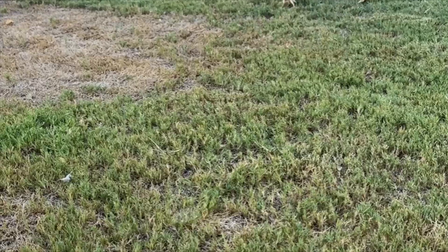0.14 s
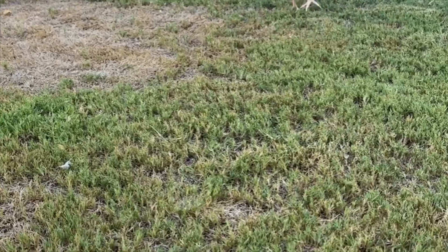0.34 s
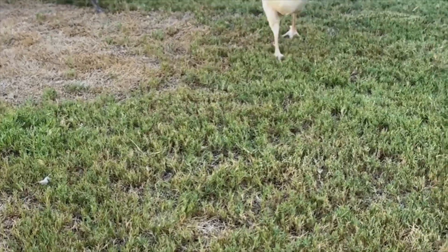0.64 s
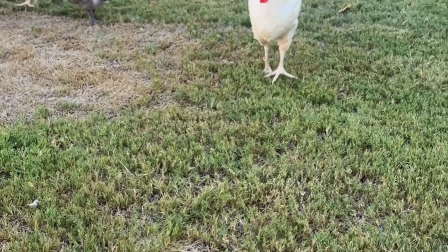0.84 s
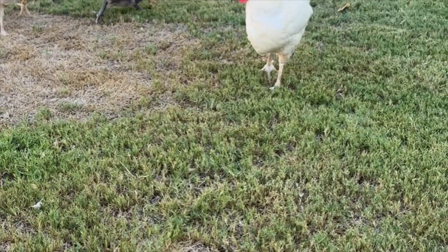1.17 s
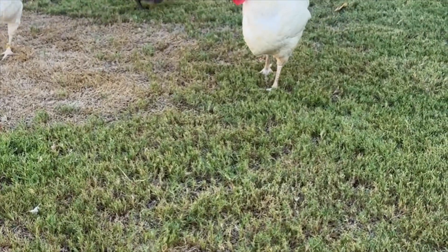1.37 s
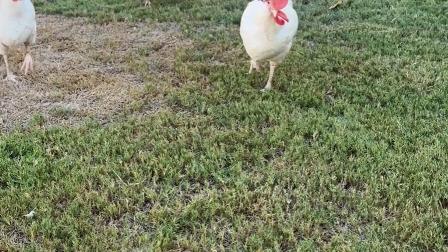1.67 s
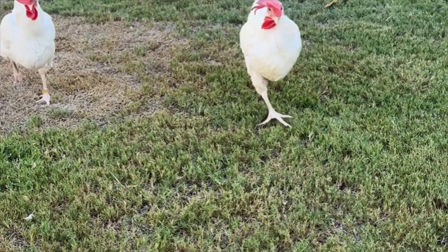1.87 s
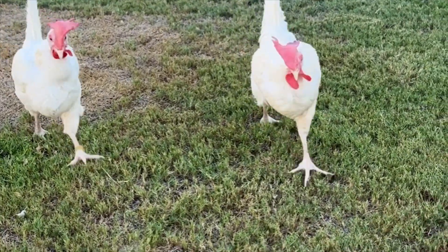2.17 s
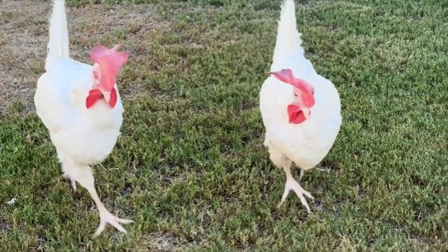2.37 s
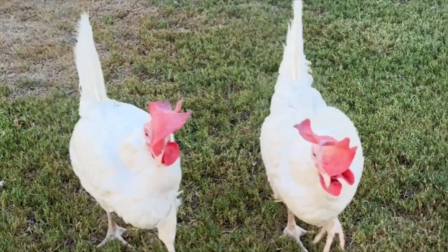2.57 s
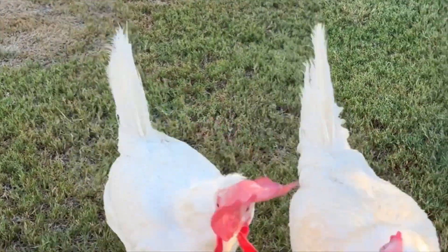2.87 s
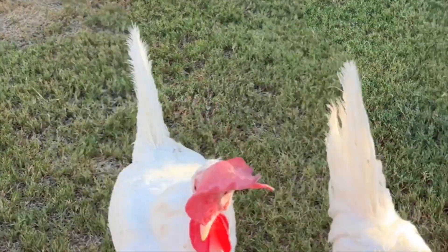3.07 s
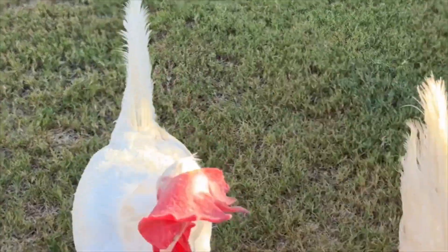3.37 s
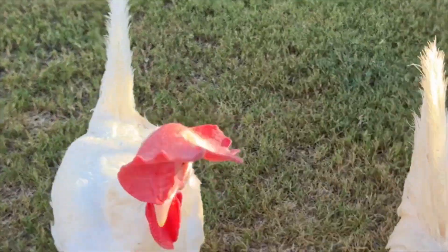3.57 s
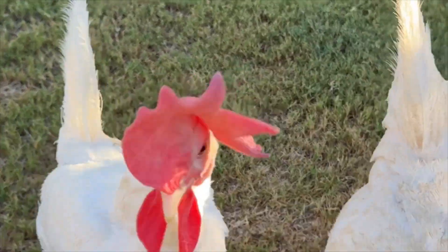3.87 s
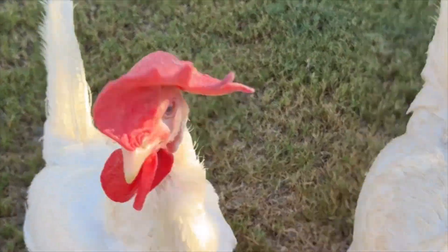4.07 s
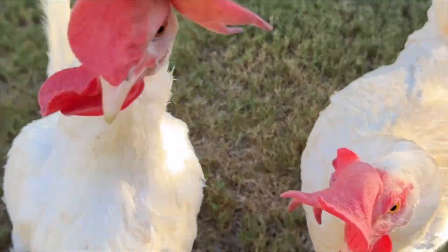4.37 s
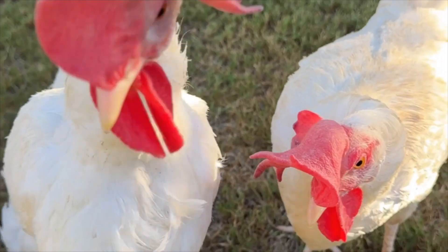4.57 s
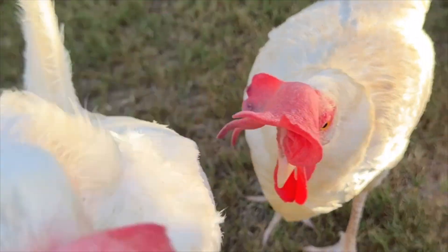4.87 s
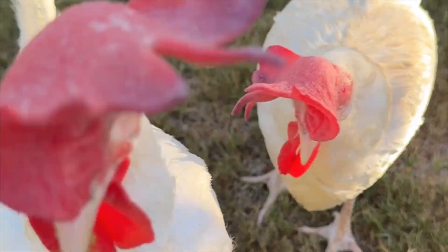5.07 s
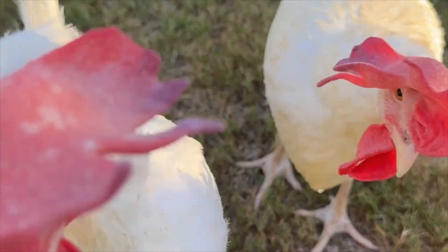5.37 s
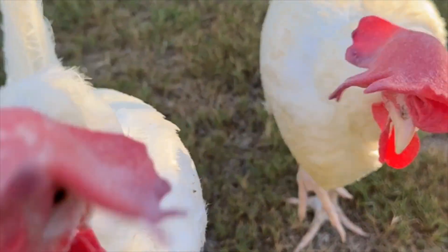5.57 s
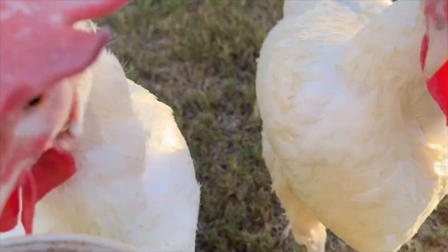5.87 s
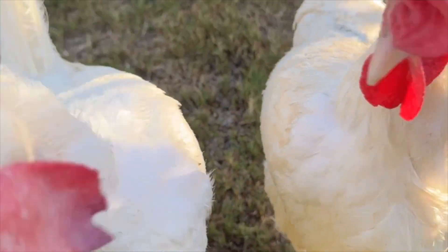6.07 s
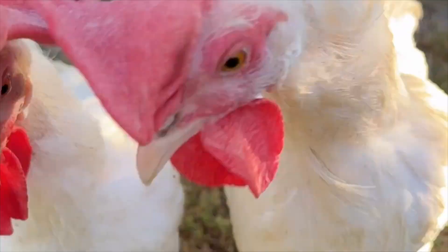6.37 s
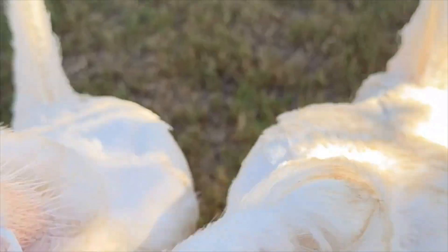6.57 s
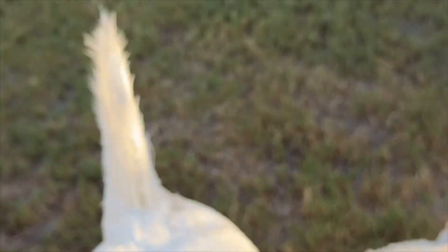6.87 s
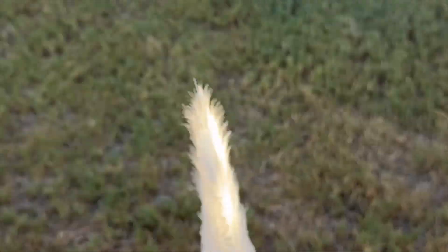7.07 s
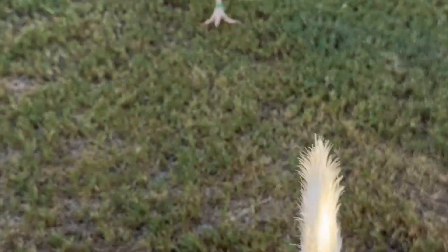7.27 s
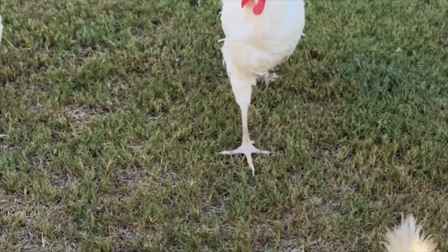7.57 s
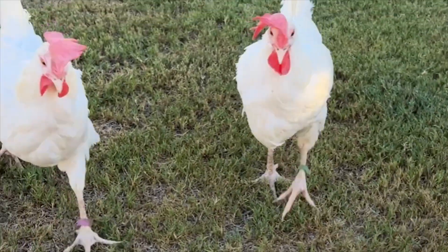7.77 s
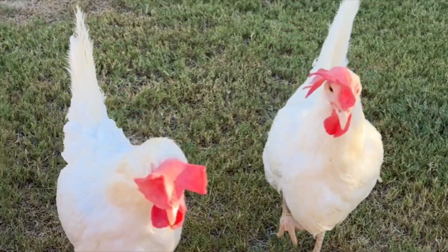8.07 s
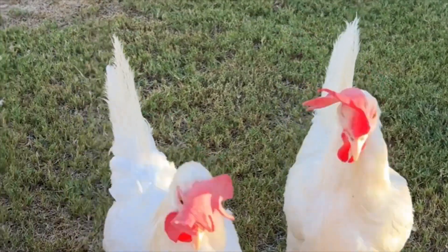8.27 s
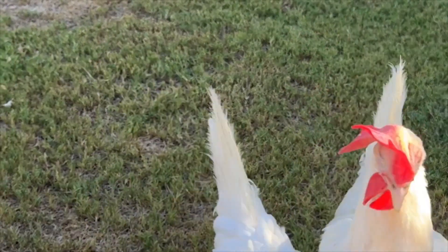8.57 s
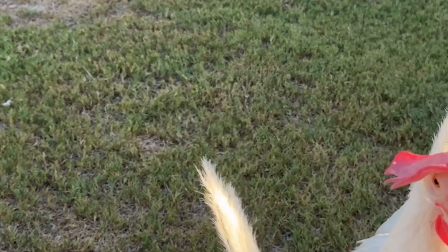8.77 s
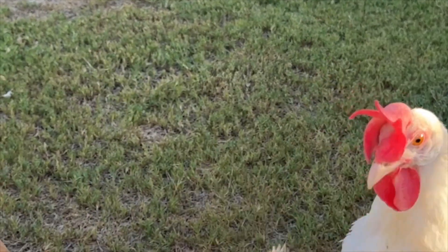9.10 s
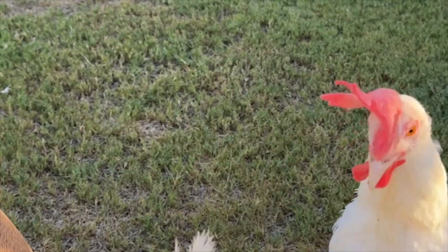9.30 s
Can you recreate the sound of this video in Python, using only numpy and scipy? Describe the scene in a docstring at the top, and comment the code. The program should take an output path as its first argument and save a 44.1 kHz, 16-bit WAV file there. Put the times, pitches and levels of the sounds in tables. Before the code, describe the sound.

A quiet grassy yard outdoors, with a low distant rumble, a very faint thin whine and a soft hiss of air. In the first half second come three tiny, faint clucks, and another at about 1.1 seconds. From about 0.9 to 3 seconds, quick light steps rustle through dry grass in short, crackling brushes, strongest around 1.5 and 2.1 seconds, with a little wind. Between 2.5 and 3 seconds, heavy muffled thumps buffet the microphone, then fade. Three louder, rattling clucks follow at 4.0, 4.3 and 4.4 seconds. From about 4.9 seconds until the end near 9.4, chickens peck and scratch very close: irregular crisp crunches, sharp ticks and short hollow knocks, with bits of dry stalk crackling back between them. A double knock lands near 7.0 seconds and a strong crack near 9.3. The sound is close and dry, with barely any reflection.

```python
"""A dry grassy yard outdoors, with chickens foraging close to a two-port microphone.
A low distant rumble, thin whine and hiss of air (filtered noise) lie under faint early clucks and
quick rustling steps (bursts of tiny clicks). Low thumps then buffet the microphone, and three louder,
rattling clucks follow (pulses ringing a throat). Last come pecks and scratches: crunching strokes of
clicks, dull knocks of short dying modes, and sharp ticks of millisecond noise."""
import sys
import numpy as np
from scipy import signal
from scipy.fft import rfft, irfft
from scipy.io import wavfile
from scipy.ndimage import uniform_filter1d

SR = 44100
rng = np.random.default_rng(int(sys.argv[2]) if len(sys.argv) > 2 else 0)


def put_to_file(sound):
    """Save the sound as 16-bit audio at rate SR, in the file named by the first command-line argument."""
    columns = np.atleast_2d(sound).T  # one column per channel
    safe = np.clip(columns, -1, 1)
    whole_steps = np.round(safe * 32767)
    wavfile.write(sys.argv[1], SR, whole_steps.astype(np.int16))


N = 416304
TIME = np.arange(N) / SR


def amp(db):
    """Decibels to gain."""
    return 10 ** (np.asarray(db) / 20)


def unit(x):
    """Scales to rms 1."""
    return x / np.sqrt(np.mean(x ** 2) + 1e-20)


def read(points, hz):
    """Values joined on a log-frequency axis."""
    f, value = np.transpose(points)
    return np.interp(np.log(hz + 1), np.log(f + 1), value)


def level(rows):
    """A dB curve over time as a gain, all but silent outside its span."""
    return amp(np.interp(TIME, *np.transpose(rows), left=-120, right=-120))


def add(mix, s, sound):
    """Adds a sound in place, starting at s seconds."""
    part = mix[..., max(round(s * SR), 0):][..., :sound.shape[-1]]
    part += sound[..., :part.shape[-1]]


def colour(x, points, size=4096):
    """Causal minimum-phase filter of unit energy with the given spectrum."""
    gain_db = np.maximum(read(points, abs(np.fft.fftfreq(size, 1 / SR))), -100)
    log_gain = np.log(amp(gain_db))
    taps = np.fft.ifft(np.exp(np.conj(signal.hilbert(log_gain)))).real[:size // 2]
    return signal.fftconvolve(x, taps / np.linalg.norm(taps))[:len(x)]


def tilted(points, treble_db, corner_hz=2200):
    """The same spectrum with more or less treble."""
    return [(hz, db + treble_db * hz ** 2 / (hz ** 2 + corner_hz ** 2)) for hz, db in points]


def band(x, hz, width):
    """A resonance of gain 1 at its peak, its width in Hz."""
    return signal.lfilter(*signal.iirpeak(min(hz, SR / 2.2), hz / width, SR), x)


def ring(t, hz, t60):
    """One mode, dying by 60 dB in t60 seconds."""
    return np.sin(2 * np.pi * hz * t) * np.exp(-np.log(1000) * t / t60)


def grains(size, per_s, spread_db):
    """Tiny fractures of dry stalks: random clicks, a few much larger than the rest."""
    height = amp(spread_db * np.minimum(rng.exponential(1, size), 4))
    return unit(height * rng.choice([-1, 1], size) * (rng.random(size) < per_s / SR))


def catches(size, depth_db, span_s):
    """Stalks catch and give way: a gain that jumps about."""
    wander = uniform_filter1d(rng.standard_normal(size), size=int(span_s * SR))
    return amp(depth_db * unit(wander))


# Phase between the microphone's two ports for near sounds.
# Each row: frequency in Hz, left lead in radians.
PORT_LEAD = [(700, .45), (1200, .17), (1700, .25), (2700, 1.3), (4400, 1.0), (5800, -.1), (8000, -1.9),
             (10000, -2.65), (15500, -4.3)]


def ports(x):
    """Sound reaches the two ports with a phase difference that varies with frequency."""
    turn = np.exp(.5j * read(PORT_LEAD, np.fft.rfftfreq(N, 1 / SR)))
    return irfft(rfft(x) * np.array([turn, turn.conj()]), N)


GUST_DB, GUST_S = -1, .05  # depth and length of the flurries


def eddies(hz, width_hz):
    """Low turbulence at the ports, in short flurries."""
    gusts = amp(GUST_DB * unit(uniform_filter1d(rng.standard_normal(N), size=int(GUST_S * SR))))
    return unit(gusts * band(band(rng.standard_normal(N), hz, width_hz), hz, width_hz))


# Distant rumble, steady but for one lull. Each row: time in seconds, level in dB.
RUMBLE_LEVEL = [(0, -44.5), (3.2, -45), (3.4, -52), (3.8, -51), (4.15, -44), (9.44, -45)]
# Spectrum of the rumble. Each row: frequency in Hz, gain in dB.
RUMBLE_SPECTRUM = [(15, -42), (30, -22), (42, -7.5), (59, 5), (86, -4.5), (114, 0), (190, -7.5), (280, -8),
                   (320, -17.5), (500, -38), (1100, -81)]
# Spectrum of the hiss of open air. Each row: frequency in Hz, gain in dB.
AIR_SPECTRUM = [(200, -18), (350, -0.5), (800, 0.5), (1360, -6.5), (2100, -8.5), (3000, -11), (6000, -17.5),
                (9000, -13.5), (15500, -19.5)]
# A faint far-off whine. Each row: time in seconds, level in dB.
WHINE_LEVEL = [(0, -73), (.6, -65.5), (5, -73)]
# Light wind at the microphone. Each row: time in seconds, level in dB.
BREEZE_LEVEL = [(1.1, -69), (1.25, -53), (3.0, -56), (3.9, -68)]
AIR_DB, WHINE_HZ = -57, 1815


def outdoors(rumble_side_db=-15, air_side_db=-4, whine_width=25):
    """Filtered noise for rumble, whine and air; a side part, with the breeze, is opposite at the ports."""
    rumble = [unit(colour(z, RUMBLE_SPECTRUM)) * level(RUMBLE_LEVEL) for z in rng.standard_normal((2, N))]
    air = [unit(colour(z, AIR_SPECTRUM)) * amp(AIR_DB) for z in rng.standard_normal((2, N))]
    whine = unit(band(rng.standard_normal(N), WHINE_HZ, whine_width)) * level(WHINE_LEVEL)
    breeze = level(BREEZE_LEVEL) * eddies(hz=80, width_hz=97)
    side = amp(rumble_side_db) * rumble[1] + amp(air_side_db) * air[1] + breeze
    return rumble[0] + whine + ports(air[0]) + np.array([side, -side])


# Clucks, faint at first and nearer in level later. Each row: start in seconds, length in seconds,
# level in dB, pulse rate per second, throat pitch as a multiple.
CLUCK_CALLS = [(0.062, 0.043, -52, 260, 1.14), (0.226, 0.045, -51.5, 233, 1.08),
               (0.401, 0.041, -51.5, 240, 1.13), (1.113, 0.039, -49.5, 170, .6),
               (4.04, 0.028, -33, 240, 1.04), (4.268, 0.039, -29.5, 240, .99),
               (4.429, 0.039, -27.5, 286, 1.0)]
# Resonances of the throat. Each row: frequency in Hz before the multiple, level in dB, t60 in seconds.
THROAT_MODES = [(220, -9, 0.038), (493, -1.5, 0.021), (820, 7.5, 0.0088), (1017, 5, 0.013),
                (1340, -2.5, 0.023), (1860, -8.5, 0.0074), (2530, -14, 0.0087), (3850, -14.5, 0.0044)]


def clucks(shut=0.92, opened=1.05, slowing=.3, top_hz=3300, onset_s=0.007, release_s=0.018):
    """Uneven, slowing pulses ring the throat, whose resonances waver and rise as the beak opens."""
    out, t = np.zeros(N), np.arange(SR // 50) / SR
    jitter, shimmer_db, flutter = .12, 1.6, .03  # unevenness of timing, strength and pitch
    lowpass = signal.butter(3, top_hz, fs=SR, output="sos")
    for s, length, db, rate, throat in CLUCK_CALLS:
        voice, age = np.zeros(SR // 8), .5 / rate
        for gap, strength, *wobble in rng.standard_normal((24, 2 + len(THROAT_MODES))):
            if age < length:
                share = age / length
                opening = shut + (opened - shut) * share
                mouth = throat * opening * (1 + flutter * np.array(wobble))
                pulse = sum((-1) ** k * amp(d) * ring(t, hz * mouth[k], t60)
                            for k, (hz, d, t60) in enumerate(THROAT_MODES))
                effort = np.sqrt(min(age / onset_s, 1, (length - age) / release_s))
                add(voice, age, amp(shimmer_db * strength) * effort * pulse)
                age += np.exp(jitter * gap + slowing * (share - .5)) / rate
        voice = signal.sosfilt(lowpass, voice)
        add(out, s, amp(db) * voice * np.sqrt(length * SR) / np.linalg.norm(voice))
    return out


PORT_COLOUR_DB = -0.17  # each clump sounds a little different at the two ports


def clump(points, db, envelope, drive, patchy_db):
    """Each clump of grass rings differently, also toward each port: random bumps on a common spectrum."""
    hz = np.geomspace(80, 16000, 40)
    common = read(points, hz) + patchy_db * rng.standard_normal(len(hz))
    apart = PORT_COLOUR_DB * np.minimum(hz / 3000, 1) * rng.standard_normal(len(hz))
    sides = (common + apart, common - apart)
    sound = np.array([colour(drive, np.column_stack([hz, port])) for port in sides])
    return amp(db) * sound * np.linalg.norm(envelope) * np.sqrt(2) / np.linalg.norm(sound)


# Pitches in Hz at which stiff stalks snap.
STALK_PITCHES_HZ = (1120, 3640, 3760, 3940, 5900)


def snaps(per_s=22, width_hz=480):
    """Stiff stalks break singly: sparse clicks ring a few fixed pitches."""
    return unit(sum(band(grains(N, per_s, 2.1), hz, width_hz) for hz in STALK_PITCHES_HZ))


def crackle(per_s=70, hz=1200, width_hz=450):
    """Thick stems give way with soft, hollow pops."""
    return unit(band(grains(N, per_s, 1.4), hz, width_hz))


def splinters(per_s, low_hz=2600, high_hz=8500, width_hz=1100, count=9):
    """Fine blades break one by one in several narrow bands, so the colour keeps shifting."""
    centres = np.geomspace(low_hz, high_hz, count)
    return unit(sum(band(band(grains(N, per_s, 5.5), hz, width_hz), hz, width_hz) for hz in centres))


# Runs of quick steps through the grass. Each row: start in seconds, length in seconds,
# mid-run level in dB, treble tilt in dB.
STEP_RUNS = [(0.932, 0.038, -51.5, -7), (1.062, 0.024, -58.5, 7), (1.244, 0.0061, -44, 1.5),
             (1.304, 0.13, -42.5, 3.5), (1.478, .11, -38, -1), (1.634, 0.11, -38, 2),
             (1.784, 0.11, -50, -5), (1.957, 0.12, -43, -4.5), (2.135, 0.1, -38.5, 0),
             (2.292, .11, -40.5, -2.5), (2.456, 0.099, -46, 0.5), (2.625, 0.115, -44, -5.5),
             (2.785, .13, -44, -2.5), (3.134, 0.07, -58, -3)]
# pace, share of each step spent dragging, gain from step to step
STEPS_PER_S, STEP_CONTACT, STEP_GROWTH_DB = 14, 0.63, 3.5


def footfalls():
    """Splits each run into steps at the birds' pace, each a little harder than the last."""
    for start, length, db, treble_db in STEP_RUNS:
        count = max(round(length * STEPS_PER_S), 1)
        period = length / (count - 1 + STEP_CONTACT)
        for k in range(count):
            step_db = db + STEP_GROWTH_DB * (k - (count - 1) / 2)
            yield start + k * period, STEP_CONTACT * period, step_db, treble_db


# Spectrum of brushed grass. Each row: frequency in Hz, gain in dB.
BRUSHED_GRASS = [(240, -51), (400, -6), (750, -8.5), (1160, -3.5), (1600, -6), (2800, -10.5), (3750, -9),
                 (5800, -11.5), (8500, -1.5), (11000, -15), (15500, -19.5)]
SNAP_FADE_S = 0.12  # the stiff stalks break as the foot first lands


def steps(rise_s=0.012, fall_s=0.02, snap_db=-4, crackle_db=-5.5, splinter_db=-11.5):
    """A foot lands, breaks a few stalks, and drags through the blades, catching and slipping."""
    lead, patchy_db, slip_db = .04, 2.8, 2.8  # lead in seconds: room for the rise
    out, pressure, landing = np.zeros((2, N)), np.zeros(N), np.zeros(N)
    t = np.arange(SR // 4) / SR - lead
    for s, length, db, treble_db in footfalls():
        stroke = np.exp(np.minimum(t, 0) / rise_s - np.maximum(t - length, 0) / fall_s)
        drag = stroke * catches(len(t), slip_db, .005) * grains(len(t), 7000, 2.9)
        add(out, s - lead, clump(tilted(BRUSHED_GRASS, treble_db), db, stroke, drag, patchy_db))
        add(pressure, s - lead, amp(db) * stroke)
        add(landing, s - lead, amp(db + treble_db) * stroke * np.exp(-abs(t) / SNAP_FADE_S))
    broken = landing * amp(snap_db) * snaps(per_s=52)
    pressed = amp(crackle_db) * crackle(per_s=300) + amp(splinter_db) * splinters(per_s=60)
    return out + broken + pressure * pressed


# Soft blows on the microphone, before its band limit. Each row: start in seconds, level in dB,
# edge level relative to the blow in dB, pitch in Hz.
MICROPHONE_BLOWS = [(2.543, -17, -21, 68.4), (2.618, -13.5, -6, 73), (2.672, -18.5, -29, 85),
                    (2.700, -17.5, -5, 108), (2.745, -13, -19, 82), (2.843, -12.5, -40, 100.5),
                    (2.884, -12.5, -46, 73), (2.965, -25, 1, 85.6), (3.056, -32.5, 2.5, 112),
                    (3.077, -29, -10, 70.6), (3.185, -36, -14, 85.4), (3.29, -36, -10, 84)]
# Spectrum of the buffeting, before the same band limit. Each row: frequency in Hz, gain in dB.
BUFFET_SPECTRUM = [(20, -25), (45, 9), (75, 10.5), (120, -1), (200, -3), (350, -28)]
# the buffeting swells, holds and dies away
BUFFET_START_S, BUFFET_RISE_S, BUFFET_HOLD_S = 2.492, 0.059, 0.38
BUFFET_DB, BUFFET_FALL_DB_PER_S = -30.5, 78


def thumps(swell_s=0.0076, edge_hz=255, edge_t60=0.047, knock_hz=450, knock_db=-12, eddy_db=-5):
    """Low noise buffets the ports unevenly; distinct blows are swelling low tones with a ringing edge."""
    age, t = TIME - BUFFET_START_S, np.arange(SR // 6) / SR
    dying_s = np.maximum(age - BUFFET_RISE_S - BUFFET_HOLD_S, 0)
    buffet = np.clip(age / BUFFET_RISE_S, 0, 1) * amp(BUFFET_DB - BUFFET_FALL_DB_PER_S * dying_s)
    out = buffet * unit(colour(rng.standard_normal(N), BUFFET_SPECTRUM))
    for s, db, edge_db, hz in MICROPHONE_BLOWS:
        push = t / swell_s * np.exp(1 - t / swell_s) * np.sin(2 * np.pi * hz * t)
        edge = ring(t, edge_hz, edge_t60) - amp(knock_db) * ring(t, knock_hz, edge_t60)
        add(out, s, amp(db) * (push + amp(edge_db) * edge))
    swirl = amp(eddy_db) * buffet * eddies(hz=114, width_hz=130)
    bandpass = signal.butter(3, [42, 780], "bandpass", fs=SR, output="sos")
    return signal.sosfilt(bandpass, [out + swirl, out - swirl])


def tick(hz, body_db, snap_s=0.001, split_s=0.00053, ring_width=3400, wide_db=-5,
         body_hz=1250, body_t60=0.012, tick_db=3):
    """A millisecond crack, bright in a band of its own, with a short hollow body."""
    t = np.arange(SR // 25) / SR
    crack = rng.standard_normal(len(t)) * (1 - np.exp(-t / split_s)) * np.exp(-t / snap_s)
    bright = unit(band(band(crack, hz, ring_width), hz, ring_width))
    bright += amp(wide_db) * unit(colour(crack, BRUSHED_GRASS))
    return amp(tick_db) * (bright / abs(bright).max() + amp(body_db) * ring(t, body_hz, body_t60))


# Beak ticks and snapping stalks. Each row: start in seconds, relative level in dB, bright band in Hz,
# hollow body relative to the crack in dB.
TICK_STRIKES = [(2.966, -39.5, 5100, 2.5), (4.953, -21.5, 4400, -27), (5.003, -30, 4470, 4.5),
                (5.011, -34, 7000, -10), (5.046, -23.5, 6750, -43), (5.104, -13, 4070, -11.5),
                (5.578, -49, 7040, -8), (5.592, -31.5, 3400, -6), (5.691, -14, 3180, -16),
                (5.786, -15.5, 4500, -35), (5.8, -23, 4100, -25), (5.821, -24, 2760, -8),
                (5.829, -27, 3440, -4), (5.864, -31, 7260, -23), (6.252, -12.5, 4400, -30),
                (6.258, -17, 3850, -30), (6.542, -17, 7200, -25), (7.372, -29.5, 6000, -21),
                (7.686, -30, 6660, -38), (7.793, -27.5, 7800, -12), (7.838, -23.5, 2710, -7),
                (7.85, -25, 3000, -4.5), (7.931, -23.5, 4350, -38), (7.954, -30, 4800, -24),
                (8.004, -18.5, 5900, -43), (8.16, -23.5, 5000, -2), (8.171, -30.5, 4180, -3),
                (8.718, -36, 7540, -28), (9.075, -23.5, 6400, -32), (9.209, -28.5, 4260, -30),
                (9.309, -13.5, 5740, -34), (9.36, -31, 3900, -25), (9.391, -21.5, 7600, -11.5)]
# Spectrum of crunched grass, for grit and pecks. Each row: frequency in Hz, gain in dB.
CRUNCHED_GRASS = [(80, -51), (160, -12.5), (310, -3), (480, -7.5), (740, -5), (1200, -6), (1700, -10.5),
                  (2200, -7.5), (4200, -12.5), (6000, -15.5), (8500, -9), (11000, -16), (15000, -16.5)]
REBOUND_S, REBOUND_DB = 0.011, -24  # the delay is drawn around this
GRIT_DB, GRIT_S = -28, 0.043  # the jolted grass crackles on after a tick


def ticks():
    """Each sharp tick is followed by a weaker rebound and a little grit."""
    out, t = np.zeros(N), np.arange(SR // 8) / SR
    for s, db, hz, body_db in TICK_STRIKES:
        add(out, s, amp(db) * tick(hz, body_db))
        add(out, s + REBOUND_S * rng.uniform(0.89, 1.8), amp(db + REBOUND_DB) * tick(hz, body_db))
        grit = colour(np.exp(-t / GRIT_S) * grains(len(t), 1200, 9.6), CRUNCHED_GRASS)
        add(out, s, amp(db + GRIT_DB) * grit)
    return out


# Grass stirring around the pecks. Each row: time in seconds, level of the brushed layer in dB.
STIR_LEVEL = [(4.55, -68.5), (4.9, -60.5), (5.3, -73), (5.65, -60.5), (7.5, -61.5), (7.9, -60.5),
              (8.3, -63), (9.44, -53.5)]


def rustle(snap_db=-7, crackle_db=-4):
    """The birds shift their weight: brushed-grass clicks, soft hollow crackles and the odd snap."""
    brushed = colour(grains(N, 5300, spread_db=7.5), BRUSHED_GRASS)
    return level(STIR_LEVEL) * (brushed + amp(snap_db) * snaps() + amp(crackle_db) * crackle())


# Pecks and scratches in the grass. Each row: start in seconds, length in seconds, level in dB,
# treble tilt in dB.
PECK_STROKES = [(4.861, .0038, -32.5, 9), (4.867, 0.019, -26, 10), (5.116, 0.0089, -36.5, -5),
                (5.498, 0.011, -23, -5), (5.57, 0.011, -38, 14), (5.811, .01, -42, 14),
                (6.029, 0.013, -22, 7), (6.245, 0.0043, -23, 25.5), (6.543, 0.017, -26.5, 10.5),
                (6.577, 0.019, -35.5, 6), (6.783, 0.042, -40, 10), (6.813, 0.012, -21, 14.5),
                (6.884, 0.0095, -37, 17), (7.012, 0.0069, -30, 8), (7.029, 0.012, -22.5, 11),
                (7.194, 0.011, -44, 2), (7.361, .023, -44, 29), (7.65, 0.016, -28.5, 9.5),
                (7.682, 0.0069, -25, 8), (7.864, 0.011, -31.5, 4.5), (8.189, 0.0036, -35, 4),
                (8.352, 0.0079, -27.5, 1), (8.606, 0.022, -35, 1.5), (8.807, 0.0092, -33.5, 7),
                (8.834, 0.033, -45, 5), (8.933, 0.049, -31, 7), (9.074, 0.032, -31, 6.5),
                (9.148, 0.0048, -39, 4), (9.304, 0.0028, -19, 16.5)]
# each clump has one hollow resonance, its pitch drawn around this
HOLLOW_HZ, HOLLOW_SPREAD_HZ, HOLLOW_DB, HOLLOW_WIDTH_HZ = 1146, 56, 10, 230
SETTLE_DB, SETTLE_S = -15, 0.04  # loose stalks fall back after every stroke


def pecks(lead=0.033, rise_s=0.0032, fall_s=0.0089):
    """Each stroke crushes a clump of stalks, which then crackle back into place in little spurts."""
    out, t = np.zeros((2, N)), np.arange(SR // 4) / SR - lead
    patchy_db, crush_db, spurt_db = 2.4, 1.6, 4.5
    for s, length, db, treble_db in PECK_STROKES:
        hollow_hz = HOLLOW_HZ + HOLLOW_SPREAD_HZ * rng.standard_normal()
        stroke = np.exp(np.minimum(t, 0) / rise_s - np.maximum(t - length, 0) / fall_s)
        settle = amp(SETTLE_DB) * (t > length) * np.exp(-abs(t - length) / SETTLE_S)
        crush = stroke * catches(len(t), crush_db, 0.0024) * grains(len(t), 10000, 5.7)
        crush += settle * catches(len(t), spurt_db, 0.0057) * grains(len(t), 4000, 1.7)
        crush += (amp(HOLLOW_DB) - 1) * band(crush, hollow_hz, HOLLOW_WIDTH_HZ)
        add(out, s - lead, clump(tilted(CRUNCHED_GRASS, treble_db), db, stroke, crush, patchy_db))
    return out


CRUMBS_DB, CRUMBS_S, CRUMB_POPS_DB = -22, 0.055, -4  # level below the peck, decay, pops against ticks


def crumbs():
    """Crumbs of dry thatch trickle back after every peck, as fine ticks and hollow pops."""
    falling = np.zeros(N)
    for s, length, db, _ in PECK_STROKES:
        add(falling, s + length, amp(db + CRUMBS_DB) * np.exp(-TIME[:SR] / CRUMBS_S))
    return falling * (splinters(per_s=12) + amp(CRUMB_POPS_DB) * crackle(per_s=130))


# A beak or claw strikes something firm. Each row: start in seconds, level in dB,
# dull thud relative to that in dB, reference pitch in Hz.
FIRM_STRIKES = [(4.873, -16.5, -45, 1480), (4.88, -18, -32, 1355), (6.034, -15, -19, 1260),
                (6.821, -13, -25, 1100), (7.031, -13, -9.5, 1110), (7.038, -11.5, -17, 1130),
                (7.388, -32.5, -13, 1184), (7.939, -21.5, -27, 897), (8.359, -20, -13.5, 1014),
                (8.613, -35, -22, 1170), (8.935, -27, -4, 1170), (9.077, -18.5, -26, 1200),
                (9.309, -9, -7.5, 1097)]
# Hollow modes of a knock. Each row: multiple of the reference pitch, relative level in dB, t60 in seconds.
HOLLOW_MODES = [(0.79, -7, 0.012), (0.999, 3, 0.021)]


def knocks(thud_hz=325, thud_t60=0.056, contact_s=0.00073):
    """A firm strike rings two short, hollow modes over a dull thud."""
    out, t = np.zeros(N), np.arange(SR // 8) / SR
    onset = 1 - np.exp(-t / contact_s)
    for s, db, thud_db, hz in FIRM_STRIKES:
        hollow = sum(amp(d) * ring(t, ratio * hz, t60) for ratio, d, t60 in HOLLOW_MODES)
        thud = amp(thud_db) * ring(t, thud_hz, thud_t60)
        add(out, s, amp(db) * onset * (hollow + thud))
    return out


def yard(x, t60, wet_db, dull_hz=8500):
    """Weak, short scatter from the ground and things nearby: decaying noise, dulled, at each port."""
    t = np.arange(SR // 3) / SR
    tail = rng.standard_normal((2, len(t))) * np.exp(-np.log(1000) * t / t60) * (t > .002)
    lowpass = signal.butter(6, min(dull_hz, SR / 3), fs=SR, output="sos")
    tail = signal.sosfilt(lowpass, tail / np.linalg.norm(tail[0]))
    return amp(wet_db) * signal.fftconvolve(x[None], tail, axes=1)[:, :N]


def lean(left_db):
    """Left and right gains for a level difference."""
    return amp(np.vstack([left_db, -left_db]) / 2)


# Balance of grass and knocks, all but central. Each row: time in seconds, left minus right in dB.
GRASS_BALANCE = [(6.3, -0.1), (9, 0)]
TICK_LEFT_DB = 2  # the ticks lie a little to the left


def scene():
    """Places every source at the two ports, with its scatter."""
    grass = pecks() + crumbs() + steps() + rustle()
    blows, cracks, voice = knocks(), ticks(), clucks()
    scatter = yard(grass.mean(0) + cracks, t60=0.014, wet_db=-11)
    scatter += yard(blows + cracks, t60=0.14, wet_db=-19.0)
    voice = voice + yard(voice, t60=0.04, wet_db=-14)[0]
    place = lean(np.interp(TIME, *np.transpose(GRASS_BALANCE)))
    near = place * ports(grass + blows) + ports(voice) + lean(TICK_LEFT_DB) * ports(cracks)
    return near + scatter + thumps() + outdoors()


EDGE_HZ = 16200


def record(dry):
    """The recorder's band limit: a steep lowpass."""
    lowpass = signal.firwin(401, EDGE_HZ, window=("kaiser", 9), fs=SR)
    return signal.oaconvolve(dry, lowpass[None], "same")


dry = scene()
out = record(dry)
put_to_file(out)
```